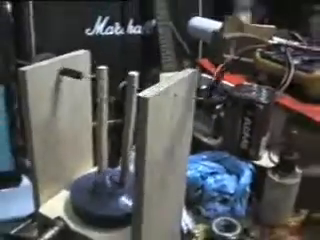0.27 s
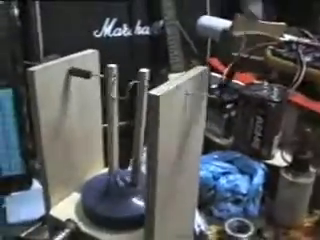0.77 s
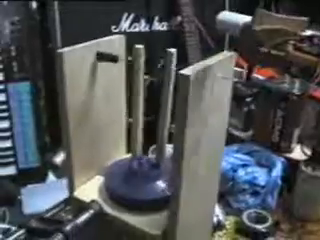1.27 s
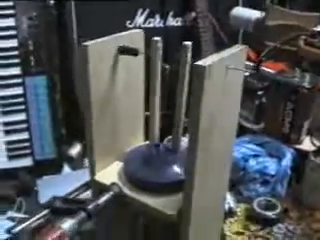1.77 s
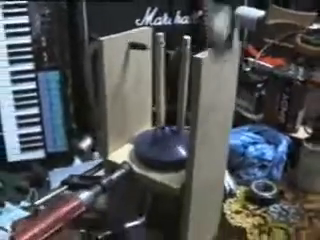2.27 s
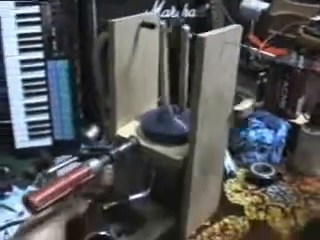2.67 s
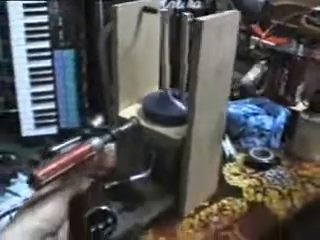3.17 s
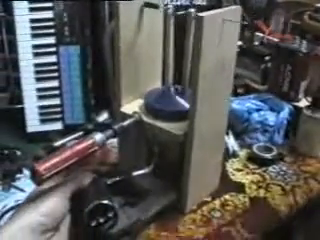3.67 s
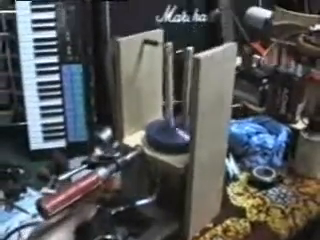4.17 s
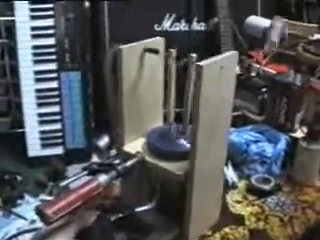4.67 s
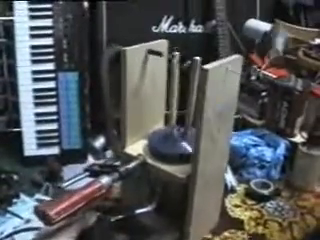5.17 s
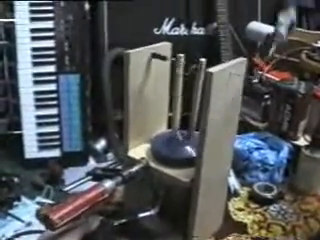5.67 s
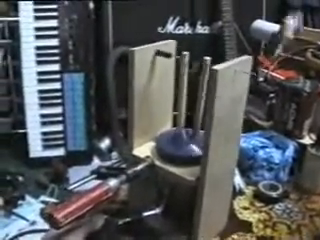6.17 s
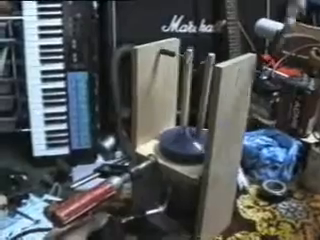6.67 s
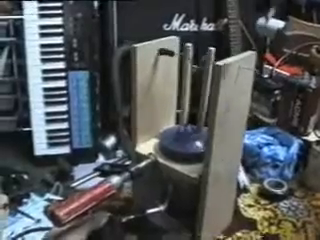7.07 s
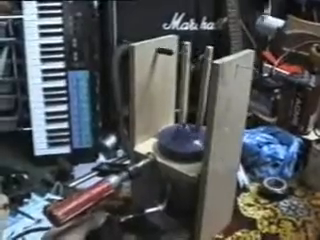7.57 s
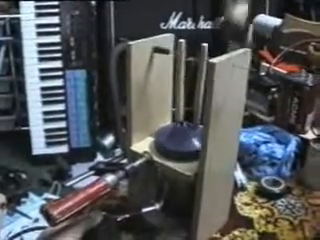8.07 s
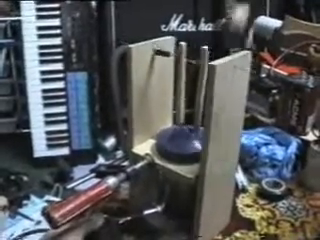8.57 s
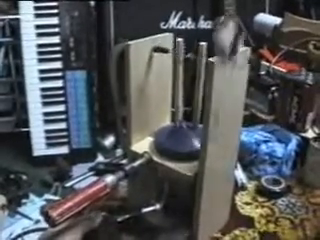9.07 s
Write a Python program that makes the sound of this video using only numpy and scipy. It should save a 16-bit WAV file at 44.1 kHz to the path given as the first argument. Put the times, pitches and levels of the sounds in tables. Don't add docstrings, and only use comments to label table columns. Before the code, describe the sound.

A gas torch hisses and softly roars throughout, slightly fluttering, in a small cluttered room with a very short tail. Over it a homemade engine turns about twice a second, clacking unevenly. At first, close by, rods rub audibly and light wooden knocks and wire rattles sound at 0.0-0.6 seconds. A dense burst of hard clatter comes at 1.0-1.4, then a strong single knock at 1.6 and a dull tick at 1.75. The microphone backs away from about 1.25 to 3; rubbing recedes, with smaller clusters near 2.3, 2.85 (bright tick), 3.3, 3.9 and 4.4. Sharper knocks and rattle hit at 5.0, then 5.4, 6.0 and 6.5. The loudest volley, with thumps, runs 7.4-7.7. Lighter knocks follow at 7.95, 8.6 and 9.15. A brief muffled dropout occurs at 8.17. Thin recorder whine and gritty, bandwidth-limited texture remain underneath.

```python
import sys
import numpy as np
from scipy import signal
from scipy.fft import rfft, irfft, dct, next_fast_len
from scipy.io import wavfile
from scipy.ndimage import uniform_filter1d

SR = 44100
rng = np.random.default_rng(int(sys.argv[2]) if len(sys.argv) > 2 else 0)


def master_out(mix):
    frames = np.transpose(np.atleast_2d(mix))
    ceiling = np.clip(frames, -1, 1)
    pcm = np.round(ceiling * 32767).astype(np.int16)
    wavfile.write(sys.argv[1], SR, pcm)


def magnitude_from_level(level_db):
    exponent = np.asarray(level_db, float) / 20
    return 10 ** exponent


N = 410130

# f/Hz, level/dB, t60/s
FRAME = [(775, -5.5, 0.046), (1010, -9.5, 0.047), (672, -13.5, 0.049), (1110, -18, 0.14),
         (1540, -7.5, 0.01), (2030, -20.5, 0.031)]
# f/Hz, level/dB, t60/s
BOARD = [(342, 4.5, 0.048), (406.5, 2, 0.046), (252.5, -0.5, 0.057)]
# t/s, distance from 0 close to 1 back
DISTANCE = [
    (0, 0.013),
    (1.0, 0.06),
    (1.25, 0.3),
    (2.4, 0.56),
    (3.0, 0.94),
    (4.5, 0.76),
    (6, 0.7),
    (7.5, 0.91),
    (9.3, 0.77),
]


def curve(table):
    s, *columns = np.transpose(table)
    return [np.interp(np.arange(N) / SR, s, c) for c in columns]


def unit(x):
    return x / np.sqrt(np.mean(x ** 2))


def band(x, lo_hz, hi_hz, order=2):
    return signal.sosfilt(signal.butter(order, [lo_hz, hi_hz], "bandpass", fs=SR, output="sos"), x)


def walk(rate):
    hold = int(SR / rate)
    levels = np.repeat(rng.standard_normal(N // hold + 1), hold)[:N]
    return 1.7 * uniform_filter1d(uniform_filter1d(levels, hold), hold)


def decay(t, t60):
    return np.exp(-np.log(1000) * t / t60)


def ring(modes, t, phases):
    return sum(magnitude_from_level(db) * np.sin(2 * np.pi * (hz * t + p)) * decay(t, t60)
               for (hz, db, t60), p in zip(modes, phases))


def spans(table):
    t = np.arange(N) / SR
    return uniform_filter1d(sum(magnitude_from_level(db) * ((t > a) & (t < b)) for a, b, db in table), 1400)


def tones(lines):
    t = np.arange(N) / SR
    return sum(magnitude_from_level(db) * np.sqrt(2) * np.sin(2 * np.pi * hz * t) for hz, db in lines)


def torch():
    # t/s, jet hiss level/dB, roar over hiss level/dB
    flame = [(0, -49.5, .3), (.45, -50, 0.8), (.75, -50, 0.7), (1.1, -50.5, 0.2), (1.35, -49, 0.8),
             (1.66, -50.5, 1.5), (2, -51, 1.4), (2.38, -51, 2), (2.98, -52.5, 1.9), (3.8, -52, 1.7),
             (4.66, -51.5, 1.4), (5.1, -52.5, 1.5), (6.2, -52.5, 1.5), (7.2, -51.5, 2), (8.0, -52, 1.6),
             (8.3, -54, 1.4), (8.65, -52, 1.4), (9.3, -51.5, 1.8)]
    # f/Hz, level/dB per Hz
    jet = [(110, -62), (180, -34), (257, -6.5), (486, -10), (771, -5.5), (1340, -2), (1810, -1),
           (3190, -12), (5340, -13.5), (6490, -10), (9090, -7.5), (10500, -19), (12500, -26.5),
           (16300, -69), (22000, -120)]
    # f/Hz, width/Hz, level/dB
    close = [(1375, 80, 2.5), (2960, 230, -3.5), (3560, 360, 5.5), (4410, 330, -9), (4930, 550, 7),
             (6520, 400, -7.5), (8500, 280, 0), (10700, 450, 3), (12500, 540, -3.5), (2700, 70, -7),
             (3035, 55, -11.5), (4120, 70, -3.5), (4570, 60, -4), (6690, 90, -6), (6320, 110, 4),
             (6040, 110, -4), (4250, 70, 4)]
    # f/Hz, width/Hz, level/dB
    far = [(1335, 32, -14), (1857, 18, 5.5), (2773, 130, -5), (3300, 240, -10), (3920, 190, -5),
           (5340, 540, 7), (6330, 320, -3), (7530, 570, 3), (8680, 130, -3.5), (11560, 400, -2.5),
           (12140, 370, 3.5), (3120, 56, -2.5), (4500, 69, -2), (2920, 50, -4.5)]
    back = np.clip(curve(DISTANCE)[0], 0, 1)
    hiss_db, roar_db = curve(flame)
    size = next_fast_len(N)
    f = np.arange(size // 2 + 1) * SR / size + 1e-3
    jet_hz, jet_level = np.transpose(jet)
    jet_db = np.interp(np.log(f), np.log(jet_hz), jet_level)
    low = 1 / (1 + (f / 2800) ** 8)
    flutter = 0.51 * walk(14)
    out = 0
    for bells, share in ((close, 1 - back), (far, back)):
        echo_db = sum(db * np.exp(-((f - hz) / width) ** 2) for hz, width, db in bells)
        noise = rfft(rng.standard_normal(size)) * magnitude_from_level(jet_db + echo_db)
        roar = unit(irfft(noise * low, size)[:N])
        hiss = unit(irfft(noise * (1 - low), size)[:N])
        roar = roar * magnitude_from_level(hiss_db + roar_db + 2.0 + flutter + 0.45 * walk(20))
        hiss = hiss * magnitude_from_level(hiss_db - 0.14 + flutter + 0.5 * walk(30))
        out = out + np.sqrt(share) * (roar + hiss)
    return out


def strokes():
    # t/s, rub level/dB
    stroke_ends = [(.04, -40), (.61, -44.5), (1.16, -39.5), (1.52, -46), (1.69, -43), (2.3, -46),
                   (2.85, -47), (3.36, -47.5), (3.91, -44.5), (4.42, -45.5), (5.04, -46.5), (5.48, -43),
                   (5.96, -46.5), (6.52, -46), (6.98, -49), (7.42, -47), (7.62, -43), (7.98, -45.5),
                   (8.6, -46), (9.12, -47)]
    load_db_per_s, ease_db_per_s, rest_db = 75.5, 252, -70
    t = np.arange(N) / SR
    each = [db - np.maximum(load_db_per_s * (s - t), ease_db_per_s * (t - s)) for s, db in stroke_ends]
    return np.maximum(np.max(each, axis=0), rest_db)


def rub():
    close_db, back_db = -43.5, -56
    low_db, back = strokes(), np.clip(curve(DISTANCE)[0], 0, 1)
    guide_db = close_db + (back_db - close_db) * back
    high_db = guide_db + 0.19 * (low_db + 58.0) + 1.7 * walk(7)
    t = np.arange(4096) / SR
    size_db = 2.7 * np.minimum(rng.exponential(size=N), 1.6)
    slips = rng.random(N) < 900 / SR
    grains = unit(rng.standard_normal(N) * magnitude_from_level(size_db) * slips)
    grains = grains + 0.54 * rng.standard_normal(N)
    board = unit(signal.fftconvolve(grains, ring(BOARD, t, np.zeros(3)))[:N])
    frame = unit(signal.fftconvolve(grains, ring(FRAME, t, np.zeros(6)))[:N])
    return magnitude_from_level(low_db - 6.5) * board + magnitude_from_level(high_db - 9.5) * frame


def thumps():
    # t/s, peak level/dB, ring f/Hz
    rocking = [(0.029, -41, 336), (0.493, -47.5, 345), (0.568, -48, 331), (1.034, -40, 434),
               (1.065, -44, 291), (1.148, -34, 333), (1.198, -41, 431), (1.237, -38, 272),
               (1.272, -42, 231), (1.36, -46, 328), (1.478, -40, 291), (1.509, -38, 328), (1.581, -38, 353),
               (1.688, -38, 320), (2.156, -46, 255), (2.351, -43, 398), (2.486, -47, 323), (2.83, -46, 231),
               (3.274, -44, 307), (3.363, -47, 263), (3.513, -47, 250), (3.795, -42, 323),
               (3.899, -45, 248), (4.049, -48, 231), (4.366, -45, 355), (4.419, -40, 285),
               (4.501, -48, 240), (4.916, -49, 350), (5.008, -47, 410), (5.373, -37, 342),
               (5.432, -47, 301), (5.474, -44, 299), (5.872, -45, 235), (6.454, -44, 293), (6.56, -47, 388),
               (6.695, -44, 234), (6.869, -43, 242), (6.932, -50, 296), (7.401, -35, 387),
               (7.566, -31.5, 350), (7.799, -45, 255), (7.949, -41, 233), (8.037, -46, 248),
               (8.538, -44, 330), (9.052, -48, 299)]
    t60_s, rise_s, trim_db = 0.068, 0.0037, -1
    out, t = np.zeros(N + 5000), np.arange(5000) / SR
    push = 1 - np.exp(-(t / rise_s) ** 2)
    for (s, db, hz), phases in zip(rocking, rng.random((len(rocking), 2))):
        modes = [(hz, db + trim_db, t60_s), (1.24 * hz, db + trim_db - 2, t60_s)]
        i = int(s * SR)
        out[i:i + len(t)] += push * ring(modes, t, phases)
    return out[:N]


def rattles():
    # t/s, peak level/dB, low part level/dB
    shakes = [(.047, -36, -3.5), (.589, -37, -3), (1.1471, -29.5, 1.5), (1.1978, -32, -3),
              (1.2403, -33, -4), (1.27, -38.5, 1), (1.1644, -37, 0), (1.7024, -47, 2), (5.0544, -40, -2),
              (2.349, -42, 1), (2.812, -43, 2), (2.8545, -33, -5), (3.2786, -40, -12), (3.3794, -42, 2.5),
              (3.899, -42, 2), (4.418, -40, -1), (4.9316, -42, 5), (5.0078, -28, -5), (5.0255, -35, -1),
              (5.453, -44, 4.5), (5.476, -42, 2), (5.9694, -44, 3), (7.7154, -44, 2), (7.511, -33.5, 0),
              (7.5673, -30, 1), (7.608, -36, 0), (7.668, -42.5, 1), (7.9663, -50, -4)]
    # t/s, peak level/dB, low part level/dB
    scrapes = [
        (1.515, -45.5, 6),
        (1.691, -36.5, 6),
        (2.27, -46, 1),
        (6.494, -41.5, 2.5),
        (6.98, -50.5, 5),
        (7.635, -42.5, 1),
        (8.042, -50, 3),
        (8.565, -48, 4),
        (9.07, -55, 1),
    ]
    # f/Hz, level/dB, t60/s
    wire_modes = [(2430, 5, 0.047), (4516, 1.5, 0.029), (3520, -9.5, 0.01), (5700, 5.5, 0.0083)]
    rattle_rise_s, scrape_rise_s, t60_s = 0.00019, 0.0076, 0.05
    t = np.arange(N) / SR
    bright, dull = np.zeros(N), np.zeros(N)
    events = [row + (rattle_rise_s,) for row in shakes] + [row + (scrape_rise_s,) for row in scrapes]
    for s, db, low_db, rise in events:
        near = slice(int(max(s - .03, 0) * SR), int((s + .2) * SR))
        late = t[near] - s
        shower = magnitude_from_level(db) * np.exp(np.minimum(late / rise, -np.log(1000) * late / t60_s))
        bright[near] += shower
        dull[near] += magnitude_from_level(low_db) * shower
    impacts = rng.standard_normal((2, N)) * magnitude_from_level(4.0 * np.minimum(rng.exponential(size=(2, N)), 3))
    metal = bright * unit(impacts[0])
    wood_hits = unit(impacts[1])
    crackle = band(metal, 2000, 7000, order=3)
    wire = signal.fftconvolve(metal, ring(wire_modes, t[:2048], np.zeros(4)))[:N]
    lingering = signal.lfilter([.001], [1, -.999], dull)
    frame = signal.fftconvolve(lingering * wood_hits, ring(FRAME, t[:4096], np.zeros(6)))[:N]
    wood = band(dull * wood_hits, 730, 2300)
    return magnitude_from_level(-17) * frame + magnitude_from_level(-8.5) * crackle + magnitude_from_level(-37.5) * wire + magnitude_from_level(8.0) * wood


def knocks():
    # t/s, peak level/dB, ring f/Hz, t60/s
    near_post = [(.209, -33, 764, 0.059), (.512, -38.5, 790, 0.053), (.565, -41, 806, 0.07),
                 (1.038, -27, 773, 0.045), (1.119, -40, 810, .062), (1.164, -36, 760, 0.061),
                 (1.2415, -28.5, 755, .15), (1.329, -41, 735, .06), (1.362, -35, 755, .06),
                 (1.5992, -22, 785, .05), (2.712, -43, 767, .055), (2.855, -39, 760, .035),
                 (3.277, -30.5, 803, 0.036), (3.514, -40, 750, 0.064), (4.414, -43, 785, .044),
                 (4.503, -38, 774, 0.085), (5.026, -31.5, 790, .11), (5.367, -31.5, 775, .043),
                 (5.868, -37, 794, 0.031), (6.587, -37, 787, 0.078), (7.01, -44, 790, .055),
                 (7.402, -22.5, 796, .048), (7.595, -28.5, 765, .11), (7.609, -34, 795, .07),
                 (7.668, -26, 775, .06), (7.95, -34.5, 787, 0.045), (8.538, -40, 790, 0.12),
                 (2.836, -43, 775, .04), (3.359, -42, 796, .055), (3.878, -45, 815, .055)]
    # t/s, peak level/dB, ring f/Hz, t60/s
    far_post = [(.081, -34.5, 1010, .04), (1.149, -25.5, 986, 0.066), (1.271, -32.5, 1100, .04),
                (1.699, -36, 1050, .04), (1.76, -35.5, 1030, 0.036), (2.269, -38, 946, 0.081),
                (2.354, -35, 970, .04), (2.816, -38, 860, .045), (2.91, -43, 1160, .055),
                (3.38, -31, 1010, 0.06), (4.939, -33.5, 945, 0.085), (5.0093, -26.5, 990, .06),
                (5.455, -37, 875, 0.058), (5.474, -32.5, 1083, 0.069), (5.928, -40.5, 1100, 0.054),
                (5.984, -39, 1000, .05), (6.486, -35, 1086, 0.069), (6.626, -36, 1080, 0.036),
                (6.717, -41, 860, .055), (6.967, -36, 920, 0.049), (7.5125, -26, 1050, .04),
                (7.5665, -23, 1000, .06), (7.716, -35, 885, 0.05), (8.037, -34.5, 950, 0.054),
                (8.101, -37, 1150, .045), (8.645, -42, 1000, .06), (8.698, -33, 935, 0.029),
                (9.154, -29.5, 1100, .04), (9.192, -35, 1160, 0.048), (3.914, -44, 980, .04)]
    # t/s, peak level/dB, ring f/Hz
    cross_piece = [(.14, -41, 755), (.633, -30, 690), (1.199, -33, 745), (1.221, -39, 740),
                   (1.309, -35, 720), (1.431, -41, 705), (1.478, -42, 610), (1.509, -35, 640),
                   (1.518, -35, 685), (2.337, -46, 750), (5.975, -41, 780), (7.637, -42, 720),
                   (8.562, -40, 656), (8.696, -36, 730), (9.155, -35.5, 745), (9.258, -41, 600)]
    # t/s, peak level/dB, ring f/Hz
    slack = [(0.494, -41, 1220), (8.103, -38, 810), (0.908, -45, 1080), (1.665, -39, 1180),
             (6.375, -43, 800), (2.236, -43, 930), (2.377, -40, 1070), (2.697, -38, 945), (3.446, -44, 813),
             (3.797, -40, 760), (4.056, -41, 790), (4.429, -43, 790), (4.607, -41, 1070),
             (4.824, -44, 1110), (5.052, -37, 850), (5.577, -47, 596), (6.07, -47, 1100), (6.557, -44, 680),
             (6.865, -38, 945), (6.937, -42, 1140), (7.498, -47, 900), (7.949, -39, 600),
             (8.088, -45, 1130), (9.04, -54, 780), (9.059, -41, 805)]
    # t/s, peak level/dB, ring f/Hz, t60/s
    further_blows = [(1.172, -35, 770, .07), (1.252, -36, 757, .07), (1.288, -40, 1300, .06),
                     (1.314, -39, 650, .08), (1.368, -40, 790, .07), (1.328, -45, 1800, .04),
                     (7.5145, -22, 1010, .035), (7.534, -44, 1400, .04), (7.547, -41, 900, .05),
                     (7.591, -31, 1000, .04), (7.572, -31, 800, .07), (7.687, -36, 1000, .04),
                     (1.5992, -29.5, 820, 0.017), (6.492, -36, 1110, 0.07), (6.593, -41, 910, .04),
                     (2.443, -43, 1450, .03), (.75, -42, 760, .04), (9.078, -42, 770, .05),
                     (2.356, -39, 690, .04), (2.8545, -38, 740, 0.033), (2.497, -39, 1450, 0.033)]
    usual_t60_s, contact_s = 0.039, 0.0012
    coupling_db_per_octave = 5
    out, t = np.zeros(N + 5000), np.arange(5000) / SR
    blows = near_post + far_post + [row + (usual_t60_s,) for row in cross_piece + slack] + further_blows
    chance = rng.random((len(blows), 10))
    clatter = unit(band(rng.standard_normal((len(blows), len(t))), 530, 1300))
    clatter = magnitude_from_level(-12.5) * clatter * decay(t, 0.081)
    push = 1 - np.exp(-(t / contact_s) ** 2)
    for (s, db, hz, t60), c, splash in zip(blows, chance, clatter):
        detune = 1 + 0.068 * (c[9] - .5)
        struck = ring([(hz, -3, max(1.1 * t60, .01)), (0.993 * hz, 0, .014)], t, [0, 0])
        rough = unit(uniform_filter1d(rng.standard_normal(len(t)), 110))
        chatter = 1 + np.minimum(t / .03, 1) * .3 * rough
        modes = [(f, g - coupling_db_per_octave * abs(np.log2(f / hz)), ring_s) for f, g, ring_s in FRAME]
        loose = magnitude_from_level(.3 * (-28 - db)) * splash
        wood = chatter * (struck + ring(modes, t * detune, c / 10)) + loose
        thud_db = -50 + 0.5 * (db + 36.5) - db
        thud = magnitude_from_level(thud_db - 1.5) * ring(BOARD, t * detune, c[6:])
        i = int((s - .0012) * SR)
        out[i:i + len(t)] += magnitude_from_level(db) * push * (wood + thud)
    return out[:N]


def ticks():
    # t/s, peak level/dB, dullness from 0 bright to 1 dull
    contacts = [
        (1.759, -24, .95),
        (2.353, -30, .5),
        (2.634, -35, .3),
        (2.812, -35, .3),
        (2.8547, -25, .3),
        (5.475, -32, .5),
        (6.447, -35, .3),
        (8.647, -32, .6),
        (8.697, -30, 0.71),
    ]
    bright, dull = np.zeros(N), np.zeros(N)
    for s, db, share in contacts:
        i, share = int(s * SR), np.clip(share, 0, 1)
        bright[i] = magnitude_from_level(db) * (1 - share)
        dull[i] = magnitude_from_level(db) * share
    return magnitude_from_level(9) * band(bright, 1500, 7000) + magnitude_from_level(20) * band(dull, 650, 1900)


def room(engine):
    t = np.arange(int(.4 * SR)) / SR
    tail = band(rng.standard_normal(len(t)), 230, 7200) * decay(t, 0.17) * (t > .004)
    return magnitude_from_level(-20.5) * signal.fftconvolve(engine, tail / np.sqrt(np.sum(tail ** 2)))[:N]


def scene():
    engine = knocks() + rattles() + rub() + thumps() + ticks()
    mono = engine + room(engine) + torch()
    return np.array([mono, mono])


def motor_whine():
    # f/Hz, rms level/dB
    whine = [(1798, -70), (2269, -74), (3601, -80), (10056, -80)]
    return tones(whine)


def coarse_copy(x, size=2048):
    # f/Hz, level/dB
    coarse = [(1500, -75), (2500, -48), (4500, -47), (7000, -47), (9500, -50), (10600, -53), (11300, -51.5),
              (12800, -52)]
    # t/s, highest kept f/Hz, step change level/dB
    changes = [(0, 12350, 2), (1.1, 12400, 2), (1.7, 12100, 1), (2.3, 12650, 0), (3.7, 12700, -1),
               (3.8, 12250, -1), (5.4, 12500, 0), (5.6, 12750, -1), (7.2, 12600, 0), (7.4, 12350, 1),
               (7.6, 12300, 1), (7.67, 11200, 2), (7.76, 12300, 1), (8.1, 12350, 1), (8.17, 11300, 1),
               (8.3, 12350, 1), (9.3, 12550, 0)]
    count, h = N // size + 2, size // 2
    window = np.sin(np.pi * (np.arange(2 * size) + .5) / (2 * size))
    padded = np.concatenate([np.zeros(size), x, np.zeros((count + 1) * size)])
    blocks = padded[np.arange(count)[:, None] * size + np.arange(2 * size)] * window
    a, b, c, d = (blocks[:, k * h:(k + 1) * h] for k in range(4))
    lines = dct(np.hstack([-c[:, ::-1] - d, a - b[:, ::-1]]), type=4, norm="ortho")
    hz = (np.arange(size) + .5) * SR / (2 * size)
    s = np.arange(count) * size / SR
    at_s, top_hz, change_db = np.transpose(changes)
    top = np.interp(s, at_s, top_hz)[:, None]
    change = np.interp(s, at_s, change_db)[:, None]
    step = magnitude_from_level(np.interp(hz, *np.transpose(coarse)) + change)
    kept = hz < top - 70 * rng.exponential(size=top.shape)
    u = dct(np.round(lines / step) * step * kept, type=4, norm="ortho")
    blocks = np.hstack([u[:, h:], -u[:, :h - 1:-1], -u[:, h - 1::-1], -u[:, :h]]) * window
    return (blocks[1:, :size] + blocks[:-1, size:]).ravel()[:N]


def track_layers():
    offset = np.array([[-.0298], [-.0676]])
    # f/Hz, rms level/dB
    ripple = [(86.13, -74), (129.2, -86)]
    # from t/s, to t/s, level/dB
    rumbling = [
        (.98, 1.27, -53),
        (1.27, 1.36, -70),
        (1.52, 1.66, -56),
        (4.94, 5.1, -57),
        (7.33, 7.4, -59),
        (7.4, 7.75, -53),
        (7.92, 8.02, -53),
        (9.08, 9.24, -52.5),
    ]
    # from t/s, to t/s, grain level/dB
    apart = [
        (.67, .83, -68),
        (1.59, 1.67, -68),
        (2.53, 2.63, -68),
        (3.0, 3.1, -66),
        (3.68, 3.75, -60),
        (7.45, 7.54, -64),
        (8.17, 8.43, -65),
        (9.06, 9.17, -68),
    ]
    opposite = np.array([[1], [-1]])
    rumble = unit(band(rng.standard_normal((2, N)), 7.8, 126, order=3)) * spans(rumbling) * magnitude_from_level(2 * walk(20))
    wander = magnitude_from_level(-64) * unit(band(rng.standard_normal((2, N)), 2, 11, order=3)) + tones(ripple)
    wander = wander + tones([(43.07, -72)]) * opposite
    grain = unit(torch()) * spans(apart) * opposite
    return offset + rumble + wander + grain


def gain_control(x):
    release = np.exp(-1 / (0.0061 * SR))
    over = signal.lfilter([1 - release], [1, -release], np.maximum(np.abs(x[0]) - .03, 0))
    late = int(0.017 * SR)
    return x / (1 + 40 * np.concatenate([np.zeros(late), over[:-late]]))


def tape_dropouts(x):
    # t/s, length/s, treble level/dB
    dropouts = [
        (3.185, .012, -4),
        (6.42, .012, -4),
        (8.17, .035, -2.5),
        (8.177, .013, -4),
    ]
    t = np.arange(N) / SR
    loss_db = sum(db * np.exp(-((t - s) / length) ** 4) for s, length, db in dropouts)
    lows = signal.sosfiltfilt(signal.butter(2, 1900, fs=SR, output="sos"), x)
    return lows * magnitude_from_level(.2 * loss_db) + (x - lows) * magnitude_from_level(loss_db)


def starve(x):
    # from f/Hz, to f/Hz
    starved = [(1350, 1650), (2100, 3300), (3850, 4250), (5950, 6750), (9700, 12000)]
    at_s, length_s = 8.177, .012
    t = np.arange(N) / SR
    lost = sum(signal.sosfiltfilt(signal.butter(3, edges, "bandpass", fs=SR, output="sos"), x)
               for edges in starved)
    return x - np.exp(-((t - at_s) / length_s) ** 2) * lost


def top_cut(x):
    return signal.sosfilt(signal.butter(12, 12750, fs=SR, output="sos"), x)


def record(dry):
    x = signal.sosfilt(signal.cheby2(8, 50, 160, "highpass", fs=SR, output="sos"), dry)
    x = signal.sosfilt(signal.ellip(8, .5, 60, 12720, fs=SR, output="sos"), x)
    x = gain_control(x) + motor_whine()
    x = tape_dropouts(x)
    x = starve(coarse_copy(x[0]))
    return top_cut(x + track_layers())


dry = scene()
out = record(dry)
master_out(out)
```